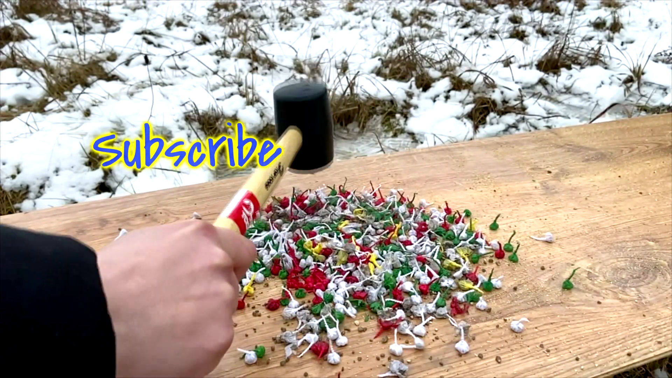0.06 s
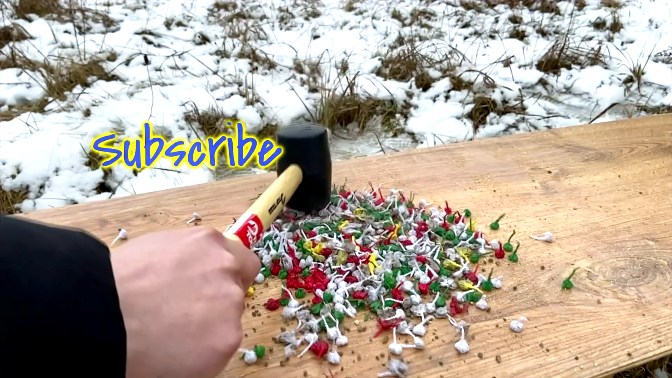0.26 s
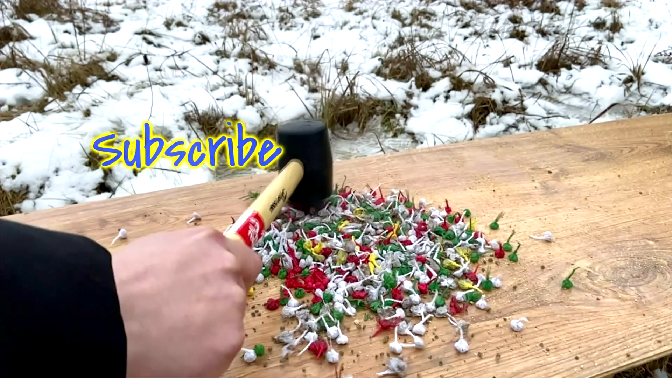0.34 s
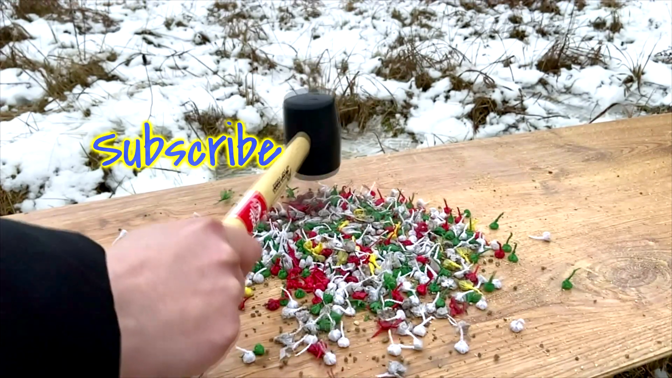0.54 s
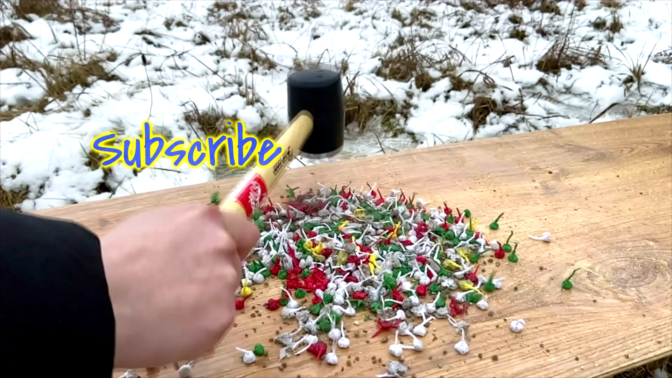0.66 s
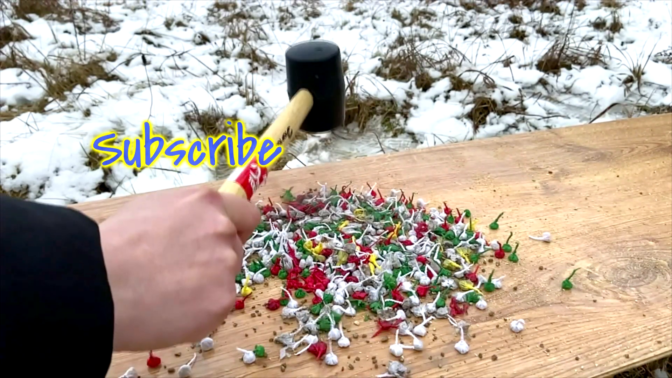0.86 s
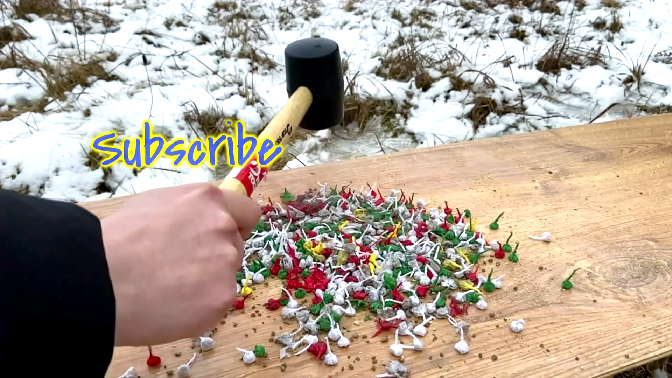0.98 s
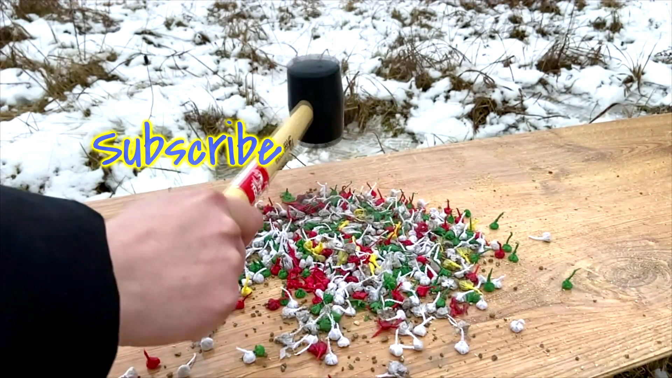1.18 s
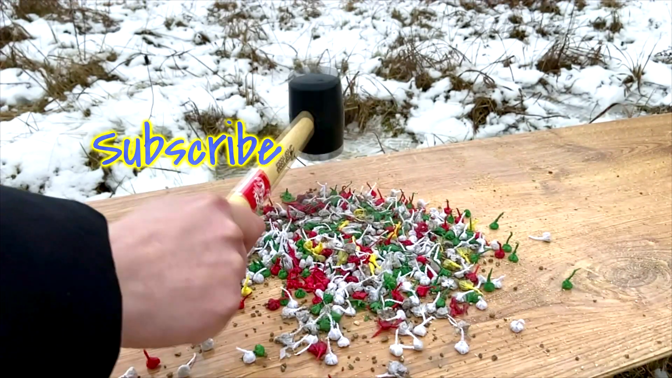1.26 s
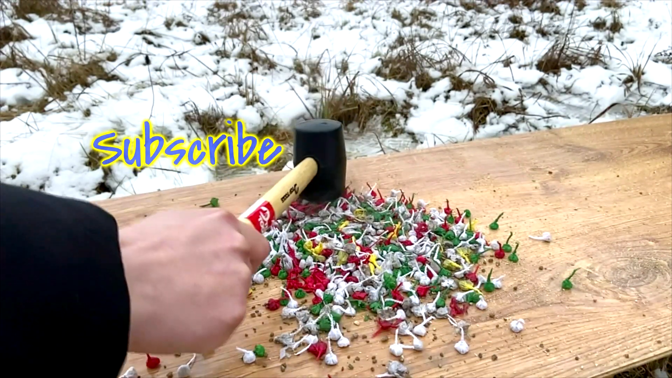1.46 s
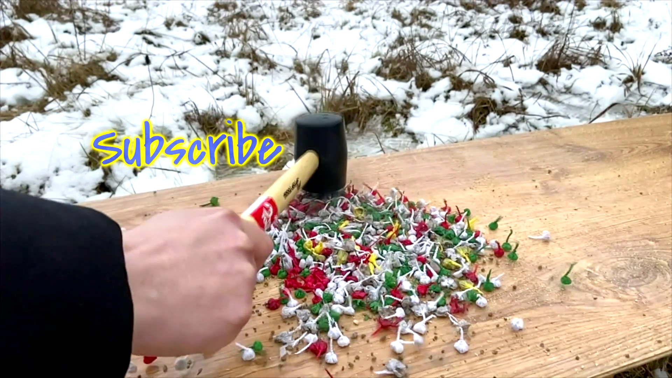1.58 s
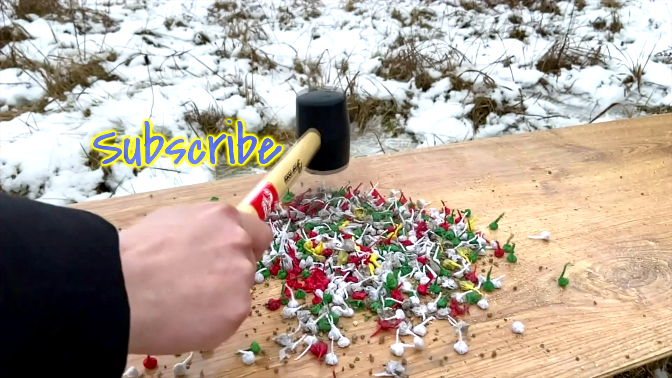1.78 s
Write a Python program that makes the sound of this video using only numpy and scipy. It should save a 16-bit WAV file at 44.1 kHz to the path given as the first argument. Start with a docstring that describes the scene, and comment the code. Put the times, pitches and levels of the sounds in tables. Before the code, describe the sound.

Slowed-down mallet blows set off firecracker snaps on a plank, harsh crackling bangs over deep thuds

```python
"""Mallet on firecracker snaps, slowed down

A rubber mallet lands on firecracker snaps on a plank outdoors: a streaky swell leads into bursts of noisy pops
that ring wood modes and clip. Down-swept cosines run along the plank as thuds; it then hums and sways. Shaped
noise makes scatter, sizzle, yard echoes and air; single impulses ring as ticks of grit."""
import sys
import numpy as np
from scipy import signal
from scipy.fft import rfft, irfft
from scipy.io import wavfile

SR = 44100
rng = np.random.default_rng(int(sys.argv[2]) if len(sys.argv) > 2 else 0)


def waveform_to_disk(signal):
    """Save audio, clipped to [-1, 1], as 16-bit WAV at the path in sys.argv[1]."""
    frames = np.transpose(np.atleast_2d(signal))
    scaled = np.clip(frames, -1, 1) * 32767
    samples = np.round(scaled).astype(np.int16)
    wavfile.write(sys.argv[1], SR, samples)


def elevation(decibels):
    """Turn decibel levels (scalar or array-like) into linear amplitude ratios."""
    levels = np.asarray(decibels, float)
    return 10 ** (levels / 20)


N = 79380
TIME_S = np.arange(N) / SR
LEFT_LAG_SAMPLES = 46


def evened(x):
    """Scales to rms 1."""
    return x / np.sqrt(np.mean(x ** 2) + 1e-30)


def read(points, hz):
    """Interpolates a table on a log-frequency axis."""
    f, value = np.transpose(points)
    return np.interp(np.log(hz + 1), np.log(f + 1), value)


def colour(x, table):
    """Minimum-phase filter with the spectrum of the table, energy 1."""
    level_db = np.maximum(read(table, abs(np.fft.fftfreq(4096, 1 / SR))), -100)
    log_gain = np.log(elevation(level_db))
    phase = -signal.hilbert(log_gain).imag
    taps = np.fft.ifft(np.exp(log_gain + 1j * phase)).real[:2048]
    return signal.oaconvolve(x, taps[None] / np.linalg.norm(taps), axes=1)[:, :N]


# left-right likeness: (frequency [Hz], shared fraction [0-1])
LIKENESS = [(300, 0.38), (1000, 0.2), (2000, 0.37), (3000, 1), (5000, .5)]


def pair(a, b):
    """Two microphones: partly shared drive, the left one late."""
    same = np.clip(read(LIKENESS, np.fft.rfftfreq(N, 1 / SR)), 0, 1)
    left = irfft(same * rfft(a) + np.sqrt(1 - same ** 2) * rfft(b), N)
    return np.array([np.roll(left, LEFT_LAG_SAMPLES), a])


def noise(table):
    """Steady two-channel noise, about rms 1, coloured by the table."""
    return colour(pair(*rng.standard_normal((2, N))), table)


def level_curve(points):
    """Gain from a (time [s], level [dB]) table, linear in dB."""
    return elevation(np.interp(TIME_S, *np.transpose(points)))


def dying(start_s, db, t60_s, rise_s):
    """Quick rise, then an even fall in dB."""
    t = np.maximum(TIME_S - start_s, 0)
    return elevation(db - 60 * t / t60_s) * (1 - np.exp(-t / rise_s))


def ringing(x, modes, t60_scale, soft_s=.0002):
    """Convolves with a sum of dying modes, low-passed, energy 1."""
    t = np.arange(6000) / SR
    taps = sum(elevation(db - 60 * t / (t60_scale * t60_s)) * np.sin(2 * np.pi * hz * t)
               for hz, db, t60_s in modes)
    lowpass = signal.butter(10, 4700, fs=SR, output="sos")
    taps = signal.sosfilt(lowpass, taps * (1 - np.exp(-t / soft_s)))
    return signal.oaconvolve(x, taps[None] / np.linalg.norm(taps), axes=1)[:, :N]


# air loudness: (time [s], level [dB])
AIR_LEVEL = [(0, -58.5), (.08, -60.5), (.3, -62), (1.2, -64.5), (1.8, -84)]
# air spectrum: (frequency [Hz], relative level per Hz [dB])
AIR_SPECTRUM = [(20, -23.5), (45, -10), (75, -7), (219, -11), (638, -4), (826, -12), (1070, -12.5),
                (1680, -20.5), (1830, -19.5), (2450, -33), (3520, -24.5), (4300, -38), (4800, -71),
                (10000, -110)]


def air():
    """Quiet outdoor air: coloured noise at a slowly changing level."""
    return level_curve(AIR_LEVEL) * noise(AIR_SPECTRUM)


# support sway, left channel: (time [s], level [dB])
SWAY_LEVEL = [(0, -67), (.25, -52.5), (.4, -22.5), (.52, -39.5), (.83, -29), (1.3, -45), (1.5, -56.5),
              (1.7, -36), (1.8, -54)]
SWAY_HZ, SWAY_CREST_S, SWAY_RIGHT_DB = 11.9, 1, -7


def sway():
    """Slow sway of the support: one low cosine, weaker on the right."""
    wave = level_curve(SWAY_LEVEL) * np.cos(2 * np.pi * SWAY_HZ * (TIME_S - SWAY_CREST_S))
    return wave * elevation(np.array([[0], [SWAY_RIGHT_DB]]))


# grains: (time [s], level before the ring gain [dB])
TICKS = [(0.0184, -63), (0.0688, -67), (0.1257, -60), (0.5067, -52.5), (0.8969, -61.5), (0.9791, -62),
         (1.0881, -62.5), (1.1394, -65), (1.256, -59)]
# grain ring: (frequency [Hz], relative level [dB], t60 before scaling [s])
GRIT_MODES = [(2580, 0, 0.024), (2890, -4.5, 0.0033), (3760, -14, .008), (3750, -8, 0.024),
              (1460, 7.5, 0.0086)]
TICK_GAIN_DB, GRIT_T60_SCALE = 24.5, 0.38


def grit():
    """Single grains tick on the wood: impulses into short modes."""
    hits = np.zeros(N)
    for s, db in TICKS:
        hits[round(s * SR)] = elevation(db + TICK_GAIN_DB)
    return ringing(np.array([np.roll(hits, LEFT_LAG_SAMPLES), hits]), GRIT_MODES, GRIT_T60_SCALE)


# swell into a blow: (blow time [s], level at blow [dB], growth [dB/s], lead [s])
SWELLS = [(.217, -27.5, 202, 0.046), (1.470, -38.5, 127, 0.099), (1.474, -13, 562, 0.032)]
# swell spectrum: (frequency [Hz], relative level per Hz [dB])
SWELL_SPECTRUM = [(88, -29), (150, -2), (410, -23.5), (604, 0.5), (782, -12), (1220, 2), (1650, -2),
                  (2110, -35), (3380, -32.5), (4640, -43), (6030, -84), (10200, -120)]
# streaks: (frequency [Hz], nominal width [Hz], relative level [dB])
STREAKS = [(520, 25, -9), (662, 30, -14), (1060, 25, -8), (1190, 18, 0), (1280, 22, -3), (1470, 25, -9),
           (1630, 22, -7), (1930, 25, -13)]
STREAK_SWELL_DB, STREAK_TAIL_DB, STREAK_T60_S = -2.5, -28, 0.27
SWELL_FADE_S, SWELL_OVERRUN_S = .01, .004


def swells():
    """A mid-pitched streaky swell leads into each blow; the streaks linger after the last."""
    level = 0
    for s, db, growth_db_per_s, lead_s in SWELLS:
        fade = np.clip((TIME_S - s + lead_s) / SWELL_FADE_S, 0, 1)
        level = level + elevation(db - growth_db_per_s * abs(TIME_S - s)) * (TIME_S < s + SWELL_OVERRUN_S) * fade
    # narrower bands ring longer
    modes = [(hz, db, 2.2 / np.clip(width_hz, 8, 60)) for hz, width_hz, db in STREAKS]
    streaks = ringing(pair(*rng.standard_normal((2, N))), modes, 0.69, soft_s=.003)
    linger = dying(SWELLS[-1][0], STREAK_TAIL_DB, STREAK_T60_S, .004)
    return level * noise(SWELL_SPECTRUM) + (level * elevation(STREAK_SWELL_DB) + linger) * streaks


# thuds: (time [s], left level [dB], right level [dB], left main crest delay [s], right same [s])
THUDS = [(.2167, -11, -16, .0215, .0115), (.2535, -4, -9.5, .0231, .0375),
         (1.4784, -11.5, -8.5, .0342, .0169)]
# low plank modes: (frequency [Hz], relative level [dB], t60 [s])
KNOCK_MODES = [(85, 0, .11), (169, -5, .09), (405, -7, .07), (505, -4, .07)]
KNOCK_DB, THUD_PEAK_S = -8, .021
CREST_RATIO = 2.66  # delay of each crest over that of the last


def thuds():
    """Bending wave in the plank: high pitches arrive first, so the thud sweeps down over low modes."""
    out = np.zeros((2, N))
    for s, left_db, right_db, left_s, right_s in THUDS:
        t = np.maximum(TIME_S - s, 1e-4)
        begun = t > 1e-4
        shape = begun * (t / THUD_PEAK_S * np.exp(1 - t / THUD_PEAK_S)) ** 1.25
        turns = np.log(t / np.array([[left_s], [right_s]])) / np.log(CREST_RATIO)
        out += elevation(np.array([[left_db], [right_db]])) * shape * np.cos(2 * np.pi * turns)
        knock = sum(elevation(db - 60 * t / t60_s) * np.sin(2 * np.pi * hz * t) for hz, db, t60_s in KNOCK_MODES)
        out += elevation(left_db + KNOCK_DB) * begun * knock
    return out


# bursts of snaps: (time [s], level [dB], t60 [s], treble gain [dB])
CRACKS = [(.2168, -1, .04, 6.5), (.2255, -9, .05, 4), (.2340, -16.5, .1, 9), (0.246, -2, .07, -1),
          (.2555, -2, 0.037, -10.5), (.2620, -31.5, .1, -15.5), (1.4700, -4, .09, 0), (1.4775, -6, .07, -9)]
# direct snap spectrum: (frequency [Hz], relative level per Hz [dB])
BLAST_SPECTRUM = [(88, -35.5), (150, -17.5), (771, 0), (970, -8), (1270, -2.5), (2360, -19.5), (2890, -12),
                  (3190, -19.5), (3690, -19.5), (4640, -28), (6030, -43), (10200, -120)]
# wood modes: (frequency [Hz], relative level [dB], t60 before scaling [s])
WOOD_MODES = [(535, 21, 0.16), (742, 0, 0.16), (915, -5, 0.3), (1285, -6.5, 0.04), (1629, -18.5, 0.33),
              (2307, -5.5, 0.27), (2512, -10.5, 0.17), (2606, -14, 0.15), (3310, -30.5, 0.2),
              (3564, -22, 0.031), (3610, -19.5, 0.19), (4650, -39, 0.031)]
# thin treble: (frequency [Hz], relative level per Hz [dB])
SHEEN_SPECTRUM = [(4300, -62.5), (5000, -3.5), (5700, -10.5), (6700, 5.5), (7600, -5), (10000, -16.5),
                  (15500, -18), (17500, -72)]
SNAPS_PER_S, SNAP_SPREAD_DB, CRACK_RISE_S = 2600, 3, .0004
WOOD_DB, WOOD_T60_SCALE, SHEEN_DB = -8, 0.17, -43


def cracks():
    """Dense uneven pops in each burst, heard directly and through the wood, under a thin sheen."""
    chance, sign, size = rng.random((3, 2, N))
    pops = (chance < SNAPS_PER_S / SR) * np.sign(sign - .5) * elevation(-SNAP_SPREAD_DB * np.log(size + 1e-3))
    drive = pair(*evened(pops))
    low = signal.lfilter([.2], [1, -.8], drive)
    treble = drive - low
    bursts, sheen_level = 0, 0
    for s, db, t60_s, treble_db in CRACKS:
        bursts = bursts + dying(s, db, t60_s, CRACK_RISE_S) * (low + elevation(treble_db) * treble)
        sheen_level = sheen_level + dying(s, db + SHEEN_DB, t60_s, CRACK_RISE_S)
    wood = elevation(WOOD_DB) * ringing(bursts, WOOD_MODES, WOOD_T60_SCALE)
    return colour(bursts, BLAST_SPECTRUM) + wood + sheen_level * noise(SHEEN_SPECTRUM)


# scatter: (time [s], level [dB], t60 [s])
SCATTERS = [(0.26, -12, 0.12), (1.482, -29.5, 0.15)]
# scatter spectrum: (frequency [Hz], relative level per Hz [dB])
SCATTER_SPECTRUM = [(76, -27.5), (130, -0.5), (310, -29.5), (694, -7), (979, -16.5), (1230, -11.5),
                    (1440, -19.5), (1630, -14), (2300, -28.5), (2750, -17), (4640, -35), (6030, -67.5),
                    (10200, -120)]
SCATTER_RISE_S, SHEEN_TAIL_DB = .004, -34.5


def scatter():
    """Near reflections and flying grit just after a blow: dying noise with a little sheen."""
    level = sum(dying(s, db, t60_s, SCATTER_RISE_S) for s, db, t60_s in SCATTERS)
    return level * (noise(SCATTER_SPECTRUM) + elevation(SHEEN_TAIL_DB) * noise(SHEEN_SPECTRUM))


# plank after a blow: (time [s], hum level [dB], rumble level [dB])
HUMS = [(0.351, -40, -18.5), (1.568, -38.5, -21)]
RUMBLE_HZ, RUMBLE_WIDTH_HZ, RUMBLE_T60_S = 52, 30, .5
RUMBLE_RISE_S, RUMBLE_LEAD_S = 0.033, .09


def rumble():
    """Rough low plank rumble: band-passed noise, starting ahead of the hum."""
    edges_hz = [RUMBLE_HZ - RUMBLE_WIDTH_HZ / 2, RUMBLE_HZ + RUMBLE_WIDTH_HZ / 2]
    band = signal.butter(2, edges_hz, "band", fs=SR, output="sos")
    rough = evened(signal.sosfilt(band, rng.standard_normal((2, N))))
    return rough * sum(dying(s - RUMBLE_LEAD_S, db, RUMBLE_T60_S, RUMBLE_RISE_S) for s, _, db in HUMS)


# sizzles: (start [s], end [s], level [dB])
SIZZLES = [(0.273, 0.366, -34), (1.504, 1.53, -59.5)]
# sizzle spectrum: (frequency [Hz], relative level per Hz [dB])
SIZZLE_SPECTRUM = [(150, -29), (350, 6.5), (700, -5), (1400, -16), (2200, -17), (3700, -23.5), (4200, -7.5),
                   (4750, -11.5), (5000, -44.5), (6000, -44.5), (6300, -24), (7100, -26), (7600, -55.5)]
SIZZLE_T60_S, SIZZLE_RISE_S, SIZZLE_STOP_S = 1, .01, .0056


def sizzle():
    """Thin noise that holds, falling slowly, and stops short."""
    level = sum(dying(s, db, SIZZLE_T60_S, SIZZLE_RISE_S) * np.clip((end - TIME_S) / SIZZLE_STOP_S, 0, 1)
                for s, end, db in SIZZLES)
    return level * noise(SIZZLE_SPECTRUM)


HUM_HZ, HUM_PEAK_S, HUM_LEFT_PHASE_RAD = 100.8, 0.063, .9
HUM_LINGER_DB, HUM_LINGER_T60_S, HUM_LINGER_RISE_S = -6.5, 1, 0.033


def hum():
    """Plank tone after a blow: a late swell, then a quieter lingering."""
    out = np.zeros((2, N))
    for s, db, _ in HUMS:
        u = np.maximum(TIME_S - s, 0) / HUM_PEAK_S
        swell = elevation(db) * u * np.exp(.5 - .5 * u ** 2)
        linger = dying(s, db + HUM_LINGER_DB, HUM_LINGER_T60_S, HUM_LINGER_RISE_S)
        phase = 2 * np.pi * HUM_HZ * (TIME_S - s) + np.array([[HUM_LEFT_PHASE_RAD], [0]])
        out += (swell + linger) * np.sin(phase)
    return out


# first wash: (time [s], level [dB])
ECHO_FIRST = [(0.38, -26.5), (0.384, -46), (1.022, -64.5), (1.126, -66), (1.36, -69.5), (1.37, -64.5)]
# second wash: (time [s], level [dB])
ECHO_SECOND = [(1.57, -40), (1.614, -51.5), (1.8, -58.5)]
# wash spectrum: (frequency [Hz], relative level per Hz [dB])
ECHO_SPECTRUM = [(76, -6), (130, -19.5), (230, -40), (292, -2), (393, -10), (737, -5.5), (831, -6.5),
                 (1070, -1), (1860, -6.5), (2300, -15.5), (2830, -10), (4640, -26.5), (6030, -88.5),
                 (10200, -120)]


def echoes():
    """Washes back from the yard: coloured noise under faded level curves."""
    level = 0
    for curve in (ECHO_FIRST, ECHO_SECOND):
        fade_in = np.clip((TIME_S - curve[0][0] + 0.02) / 0.18, 0, 1)
        fade_out = np.clip((curve[-1][0] + 0.29 - TIME_S) / 0.078, 0, 1)
        level = level + level_curve(curve) * fade_in * fade_out
    return level * noise(ECHO_SPECTRUM)


def scene():
    """Sum of all sources."""
    before = air() + sway() + grit() + swells()
    blows = thuds() + cracks() + scatter()
    after = rumble() + sizzle() + hum() + echoes()
    return before + blows + after


def roll_off(x):
    """The treble ends steeply here."""
    return signal.sosfilt(signal.butter(12, 16000, fs=SR, output="sos"), x)


CLIP_LEVEL, HISS_DB = 1.0, -100


def record(dry):
    """Hard overload adds treble on the peaks; faint hiss follows."""
    clipped = np.clip(dry, -CLIP_LEVEL, CLIP_LEVEL)
    mix = clipped + elevation(HISS_DB) * rng.standard_normal(dry.shape)
    return roll_off(mix)


dry = scene()
out = record(dry)
waveform_to_disk(out)
```